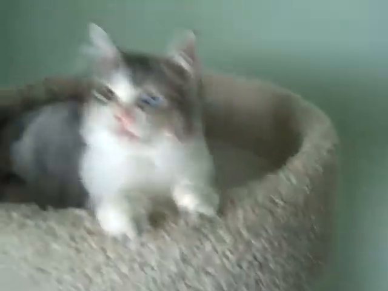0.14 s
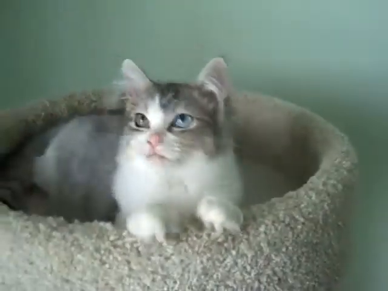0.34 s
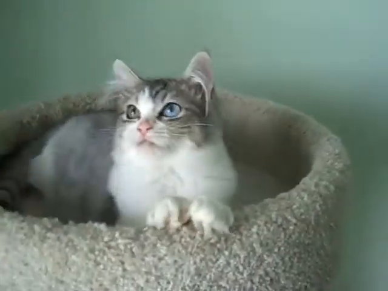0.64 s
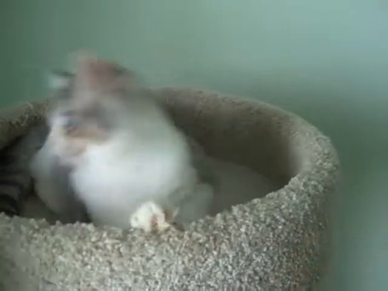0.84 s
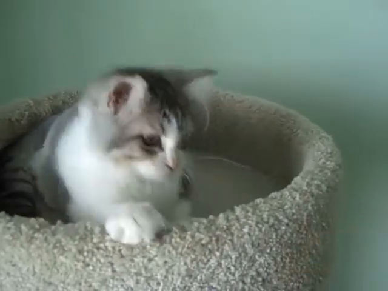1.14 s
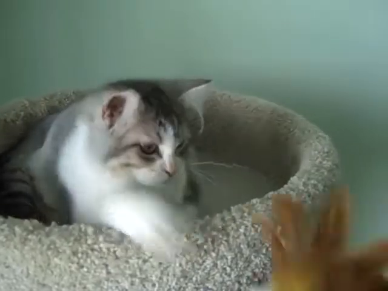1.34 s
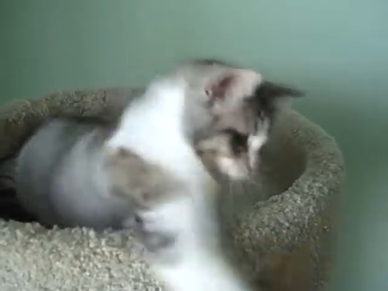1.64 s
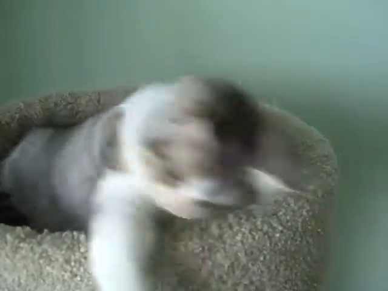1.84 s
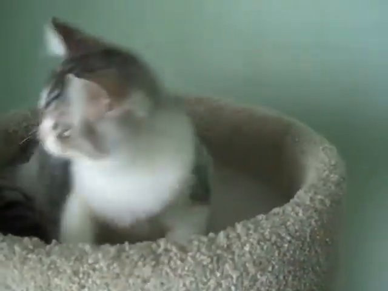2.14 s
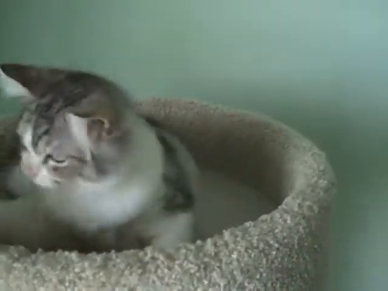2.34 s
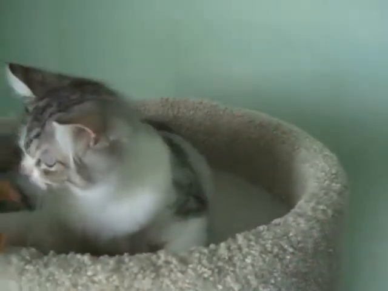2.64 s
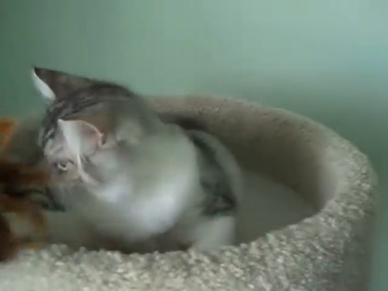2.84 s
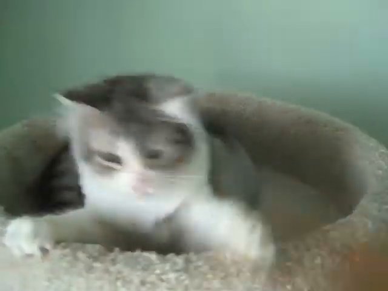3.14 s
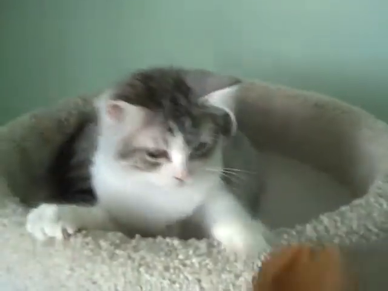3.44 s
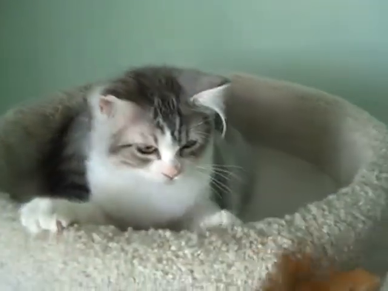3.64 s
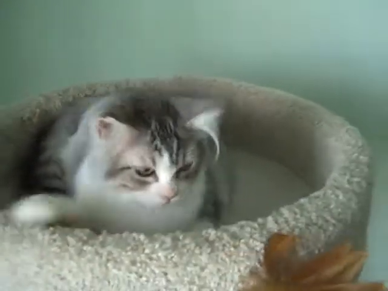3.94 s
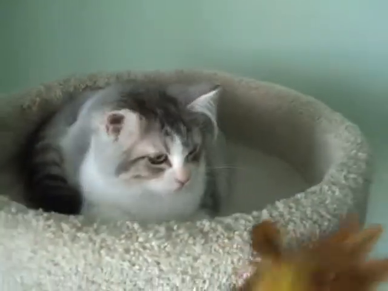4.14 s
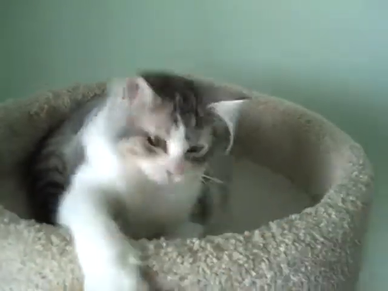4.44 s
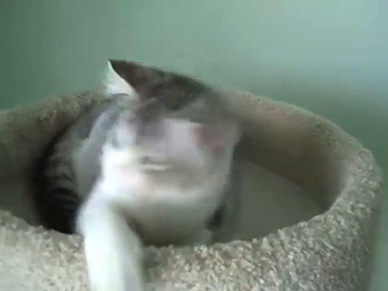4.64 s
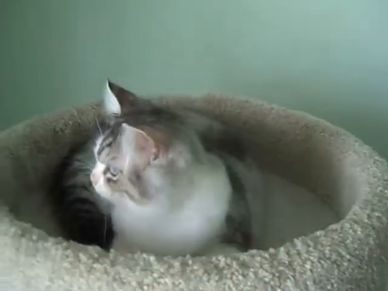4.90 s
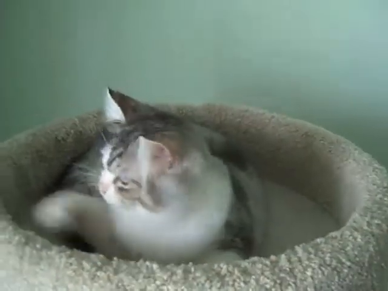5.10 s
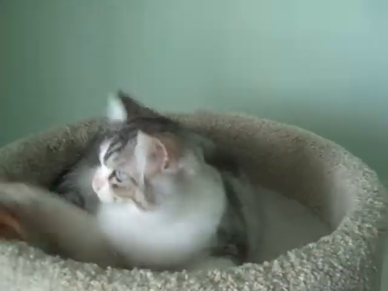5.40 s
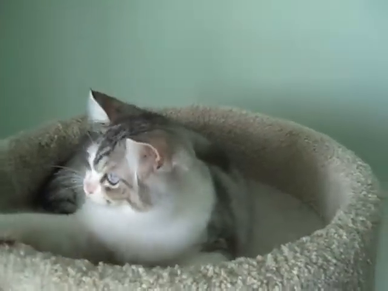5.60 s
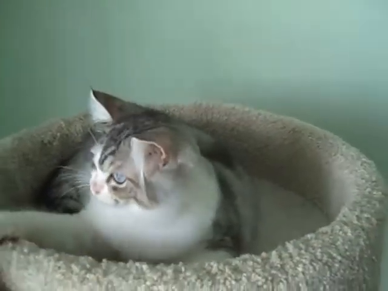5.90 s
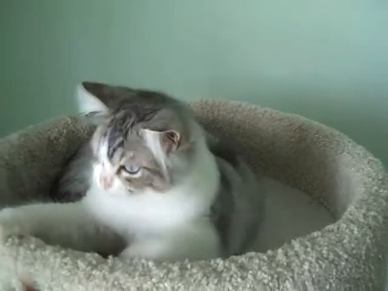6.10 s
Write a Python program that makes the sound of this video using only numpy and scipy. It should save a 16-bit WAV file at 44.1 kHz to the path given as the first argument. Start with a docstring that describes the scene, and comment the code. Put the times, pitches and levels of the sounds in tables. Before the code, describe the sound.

A feather wand with crisp foil streamers is swung and flicked around a kitten on a carpeted perch. Short, bright crackling bursts come at uneven intervals, with soft paw rubs and low ticks between them. The toy slaps down about halfway, a few faint wooden knocks come from across the room, then it lands again, harder. A last flick follows. The microphone is close, with a quiet hiss and slight room echo.

```python
"""A feather wand with crisp streamers, swung and flicked about a kitten on a carpeted perch, close to the
microphone of a small camera. The foil buckles in tiny crackles: a swing swells and fades, a flick is a
sudden shower that settles. Paws rub the carpet, the stick clicks, and twice the toy slaps down hard.
Wood knocks farther off in the bare-walled room, and soft low ticks sound over a quiet hiss."""
import sys
import numpy as np
from scipy import signal
from scipy.fft import rfft, irfft, next_fast_len
from scipy.io import wavfile
from scipy.ndimage import uniform_filter1d, map_coordinates

SR = 44100
rng = np.random.default_rng(int(sys.argv[2]) if len(sys.argv) > 2 else 0)


def inscribe(sig):
    """Save sig as 16-bit PCM at rate SR to the path in sys.argv[1].

    A 1-D sig is mono; a 2-D sig holds one channel per row.
    Samples are clipped to [-1, 1] before scaling.
    """
    pcm = np.round(np.clip(np.atleast_2d(sig).T, -1, 1) * 32767)
    wavfile.write(sys.argv[1], SR, pcm.astype(np.int16))


N = 276066


def amp(db):
    """Decibels to gain."""
    return 10 ** (np.asarray(db) / 20)


def unit(x):
    """Scale to rms 1."""
    return x / np.sqrt(np.mean(x ** 2) + 1e-20)


def along(points, hz):
    """Read (Hz, value) points on a log frequency axis."""
    freqs, values = np.transpose(points)
    return np.interp(np.log(hz + 1), np.log(freqs), values)


def add(track, s, sound):
    """Mix a short sound into the track at time s."""
    start = max(round(s * SR), 0)
    part = track[start:start + len(sound)]
    part += sound[:len(part)]


def coloured(x, spectrum):
    """Causal filter with this spectral shape; white noise keeps its power."""
    size = 2 * next_fast_len(N // 2 + SR // 4)
    gain = unit(amp(along(spectrum, np.fft.rfftfreq(size, 1 / SR))))
    cepstrum = irfft(np.log(gain + 1e-6))
    cepstrum[1:size // 2] *= 2  # fold to minimum phase
    cepstrum[size // 2 + 1:] = 0
    return irfft(rfft(x, size) * np.exp(rfft(cepstrum)), size)[:N]


def burst(t60):
    """A puff of noise that falls 60 dB in t60 seconds."""
    t = np.arange(SR // 20) / SR
    return rng.standard_normal(len(t)) * amp(-60 * t / t60)


def swell(s, db, rise, fall):
    """Power of a stroke that rises to its crest at time s and falls away."""
    t = np.arange(N) / SR
    from_crest = np.maximum((s - t) / rise, (t - s) / fall)
    return amp(db - 60 * np.minimum(from_crest, 2)) ** 2


def swells(rows, fall_ratio):
    """Summed power of strokes that each take fall_ratio times as long to fall as to rise."""
    return sum(swell(s, db, rise, fall_ratio * rise) for s, db, rise in rows)


def hiss():
    """Steady room air and microphone hiss."""
    # noise floor (frequency [Hz], relative level [dB])
    spectrum = [(30, -1.5), (60, -4), (130, -7), (220, -10), (340, -8.5), (600, -11.5), (1000, -12.5),
                (2000, -14), (3500, -17), (8000, -22), (15500, -27.5)]
    return amp(-67.2) * unit(coloured(rng.standard_normal(N), spectrum))


def room(x, delay_s=.005):
    """Diffuse answer of the bare walls: the energy of each band lingers as fading noise."""
    # reverberation (frequency [Hz], time to fall 60 dB [s])
    decay_times = [(150, .5), (500, 0.78), (1500, 1.23), (4000, 0.88), (9000, 0.66), (15000, 0.38)]
    hz, t, bands = signal.stft(x, SR, nperseg=256)
    fade = amp(-60 * t[t < 1] / along(decay_times, hz)[:, None]) ** 2
    fade /= fade.sum(axis=1, keepdims=True)
    energy = uniform_filter1d(np.abs(bands) ** 2, size=3, axis=0)
    lingering = signal.fftconvolve(energy, fade, axes=1)[:, :len(t)]
    noise = signal.stft(rng.standard_normal(N), SR, nperseg=256)[2]
    wet = signal.istft(np.sqrt(np.abs(lingering)) * noise / noise.std(), SR, nperseg=256)[1]
    return np.pad(wet, (round(delay_s * SR), 0))[:N]


def knocks(walls_db=10):
    """Well damped wood knocks across the room, reaching the microphone mostly by way of the walls."""
    # blows on the wood (time [s], level [dB], thud over clack [dB])
    blows = [(.102, -66, -18), (3.887, -48.5, -1.5), (3.935, -57, -4), (4.012, -52.5, -12),
             (4.141, -62, -16)]
    # the bright clack (frequency [Hz], relative level [dB])
    clack_spectrum = [(300, -12), (750, -4), (1050, 0), (1400, 1.5), (1750, 3.5), (2080, 2.5), (2400, -4),
                      (3500, -3), (4500, -8.5), (9000, -18), (15000, -28)]
    # the low thud of a heavy blow (frequency [Hz], relative level [dB])
    thud_spectrum = [(80, -28), (180, -12), (280, -3), (420, -1), (560, -2.5), (750, -12), (1500, -36)]
    clacks, thuds = np.zeros(N), np.zeros(N)
    for s, db, thud_db in blows:
        add(clacks, s, amp(db) * burst(t60=0.034))
        add(thuds, s, amp(db + thud_db) * burst(t60=0.03))
    clacks = coloured(clacks, clack_spectrum)
    clacks += amp(walls_db) * room(clacks)
    thuds += amp(walls_db) * room(thuds)
    return clacks + coloured(thuds, thud_spectrum)


def ticks(gap_s=.03417, relax_s=0.098, edge_hz=650):
    """Rounded jumps of the baseline that relax: soft low ticks, singly or in evenly spaced runs."""
    # runs of ticks (time [s], ticks [count], signed jump [linear])
    runs = [(.1444, 1, -0.0042), (1.0185, 1, 0.0018), (1.5057, 1, -0.0044), (1.842, 1, 0.0018),
            (2.1855, 1, -0.0043), (2.433, 1, 0.0025), (2.4518, 1, 0.0025), (2.8432, 2, -0.0036),
            (3.1585, 1, 0.0029), (3.1866, 1, 0.0068), (3.5787, 4, -0.0035), (4.558, 1, 0.0027),
            (4.5804, 1, 0.0027), (4.6534, 1, 0.011), (5.0226, 7, -0.0031), (5.505, 1, 0.0023),
            (5.8605, 1, -0.0046)]
    jumps = np.zeros(N)
    for s, count, jump in runs:
        for k in range(round(count)):
            add(jumps, s + k * gap_s, np.array([jump]))
    rounded = signal.lfilter(*signal.butter(1, edge_hz, fs=SR), jumps)
    return signal.lfilter([1], [1, -np.exp(-1 / (relax_s * SR))], rounded)


def wand_motion(flick_rise_s=.021, settle_db=-17, settle_s=0.56, idle_turns_per_s=3):
    """How hard the streamers shake: swings, flicks, the settling after each flick, a faint idle stir."""
    # sudden flicks (crest time [s], level [dB], time to fall 60 dB [s])
    flicks = [(0.736, -55, 0.06), (1.017, -37, .5), (1.793, -45.5, .3), (1.84, -48.5, .3),
              (2.39, -51.5, .35), (2.452, -33.5, .15), (3.186, -30.5, .04), (3.516, -46, .22),
              (4.477, -58, .3), (4.559, -42, .1), (4.567, -35.5, .07), (4.581, -38, .09),
              (4.655, -27.5, 0.01), (5.506, -37.5, .05)]
    # smooth swings (crest time [s], level [dB], time to rise 60 dB [s])
    swings = [(.8, -67, 1.5), (.97, -65, .9), (1.955, -51, .3), (2.16, -64.5, .42), (3.06, -61, .65),
              (3.167, -39.5, 0.24), (3.32, -52.5, .52), (3.97, -64.5, 1.3), (4.29, -60, .38),
              (4.53, -55.5, .27), (4.647, -41, .15), (5.675, -53, .66), (6.245, -56.5, .9)]
    flicking = sum(swell(s, db, flick_rise_s, fall) for s, db, fall in flicks)
    settling = sum(swell(s, db + settle_db, flick_rise_s, settle_s) for s, db, _ in flicks)
    wander = map_coordinates(rng.standard_normal(N), [np.arange(N) * idle_turns_per_s / SR])
    idle = amp(-81 + 3 * wander) ** 2  # the dangling toy never hangs quite still
    return np.sqrt(flicking + settling + swells(swings, fall_ratio=1.12) + idle)


def crackles(per_s, spread_db, life_s):
    """A shower of tiny noise grains of uneven size, rms 1."""
    sizes = amp(spread_db * np.minimum(rng.standard_normal(N), 1))
    onsets = (rng.random(N) < per_s / SR) * sizes
    power = signal.lfilter([1], [1, -np.exp(-2 / (life_s * SR))], onsets ** 2)
    return unit(np.sqrt(power) * rng.standard_normal(N))


def small_snaps(motion, per_s=32, spread_db=3, crest_db=-23, growth=.74):
    """Chance snaps (time [s], level [dB]); growing less than the rustle, they mark gentle motion."""
    at = np.flatnonzero(rng.random(N) < per_s / SR)
    scatter_db = spread_db * rng.standard_normal(N)[at]
    motion_db = 20 * np.log10(motion[at] / motion.max())
    return list(zip(at / SR, crest_db + growth * motion_db + scatter_db))


def streamers(resonance=1.3):
    """Foil streamers buckle close to the microphone; the harder the motion, the louder they crackle."""
    # loud snaps of single streamers (time [s], level [dB])
    loud_snaps = [(.7345, -36), (.9245, -36.5), (1.0153, -24), (1.0332, -23), (1.1302, -21.5), (1.792, -30),
                  (1.838, -27.5), (1.87, -33), (2.4325, -22), (2.618, -40), (2.9222, -40.5), (3.158, -26),
                  (3.1812, -22), (3.186, -18), (3.3087, -30.5), (3.513, -31), (4.5147, -28.5),
                  (4.5645, -24), (4.6115, -28), (4.652, -15.5), (4.6558, -17.5), (5.504, -24),
                  (6.2423, -39)]
    # crackling foil (frequency [Hz], relative level [dB])
    spectrum = [(100, -24), (400, -16), (1100, -13.5), (1800, -6.5), (3500, -5.5), (5500, -4), (8500, -5.5),
                (11000, -0.5), (13000, 1.1), (15800, -4)]
    motion = wand_motion()
    grains = crackles(per_s=1500, spread_db=4.0, life_s=0.00048)
    rustle = motion * (grains + 0.43 * rng.standard_normal(N))
    snaps = np.zeros(N)
    for s, db in loud_snaps + small_snaps(motion):
        snap = burst(t60=.004) + .12 * burst(t60=.02)
        # every buckling patch of foil has its own size, hence its own brief pitch
        patch = signal.iirpeak(rng.uniform(6100, 15400), Q=5, fs=SR)
        snap += resonance * signal.lfilter(*patch, snap)
        add(snaps, s, amp(db - 1.3) * snap / np.abs(snap).max())
    return coloured(amp(-.3) * rustle + snaps, spectrum)


def paws():
    """Carpet fibres slip under the kitten's paws: a close, dull, fine-grained rub."""
    # rubs of paws and fur (crest time [s], level [dB], time to rise 60 dB [s])
    rubs = [(1.02, -57, .08), (1.156, -57, 0.12), (1.24, -68.5, 0.2), (1.56, -67.5, .35), (1.8, -64, 0.24),
            (1.91, -64, .5), (2.16, -70.5, 0.06), (3.66, -65.5, 1.1), (6.22, -70, 1)]
    # rubbed carpet (frequency [Hz], relative level [dB])
    spectrum = [(100, -15), (300, -3), (550, -2), (1500, -1.5), (2200, -4.5), (4000, -9), (15000, -34)]
    rubbing = np.sqrt(swells(rubs, fall_ratio=1.63))
    return coloured(rubbing * crackles(per_s=2500, spread_db=4, life_s=.001), spectrum)


def stick():
    """The wand's thin stick clicks and bounces once, its modes struck a little differently each time."""
    # the click and its bounce (time [s], level [dB])
    clicks = [(2.7015, -48), (2.709, -53)]
    # modes of the stick (frequency [Hz], relative level [dB], time to fall 60 dB [s])
    modes = [(2300, -2, .012), (3285, -2, 0.033), (3340, -22, .45), (4930, -5, .025), (6300, -7, .015)]
    t = np.arange(SR // 4) / SR
    track = np.zeros(N)
    for s, db in clicks:
        for hz, mode_db, t60 in modes:
            envelope = amp(db - 2.5 + mode_db + rng.normal(0, 1) - 60 * t / t60)
            add(track, s, envelope * np.sin(2 * np.pi * (hz * t + rng.random())))
    return track


def slaps(contact_s=.0012):
    """The soft body of the toy lands: one low push of air and a dull, dry pat."""
    # impacts of the two landings (time [s], pat level [dB], push level [dB])
    impacts = [(3.1813, -42, -60), (3.186, -36.5, -52), (4.653, -31.5, -27), (4.6559, -36, -42),
               (4.666, -42, -50)]
    # the pat (frequency [Hz], relative level [dB])
    spectrum = [(40, -18), (120, -12), (220, -5.5), (420, 1), (800, -1.5), (1100, -2), (1500, 0),
                (2200, -11), (6000, -29), (15000, -42)]
    age = np.arange(SR // 20) / SR / contact_s  # in contact times
    push = age * (1 - age / 2) * np.exp(-age)
    pats, pushes = np.zeros(N), np.zeros(N)
    for s, db, push_db in impacts:
        add(pats, s, amp(db) * burst(t60=0.013))
        add(pushes, s, amp(push_db) * push)
    return coloured(pats, spectrum) + pushes


def scene():
    """Mono, from beside the perch: the near sounds are mostly dry, with a faint answer from the walls."""
    near = streamers() + stick() + paws()
    return (near + amp(-7.5) * room(near) + slaps() + knocks() + ticks() + hiss())[None]


def record(dry):
    """The small camera keeps nothing above its band limit."""
    top_hz = 15950
    size = next_fast_len(N + SR)
    passband = np.fft.rfftfreq(size, 1 / SR) < top_hz
    return irfft(rfft(dry, size) * passband, size)[:, :N]


dry = scene()
out = record(dry)
inscribe(out)
```